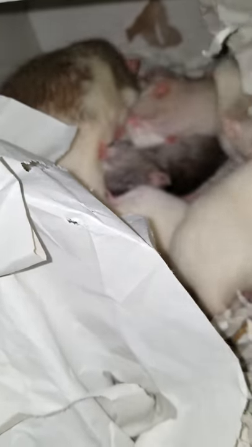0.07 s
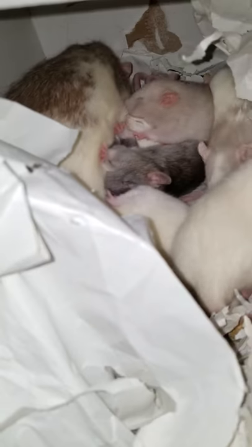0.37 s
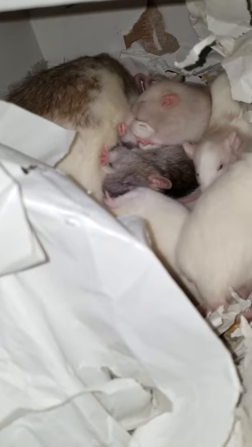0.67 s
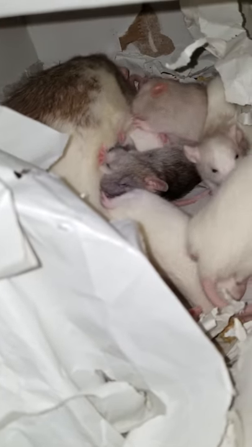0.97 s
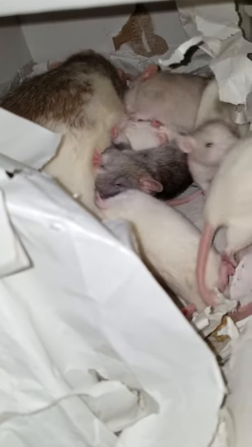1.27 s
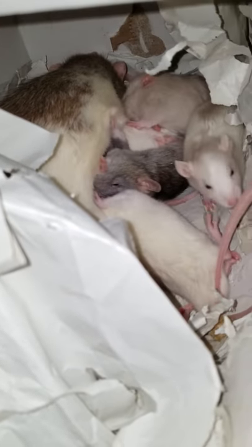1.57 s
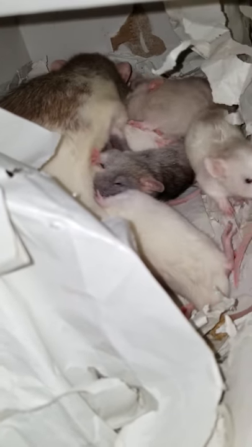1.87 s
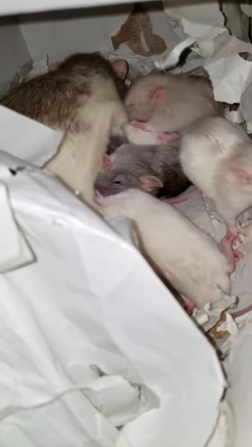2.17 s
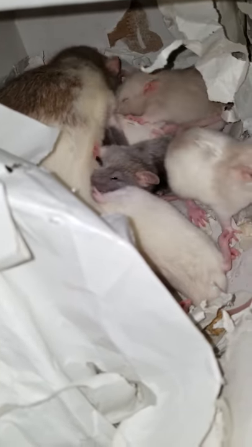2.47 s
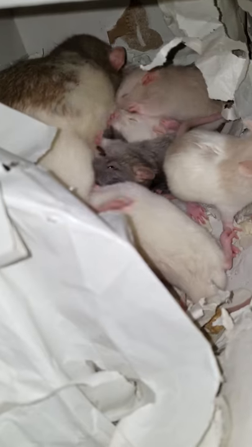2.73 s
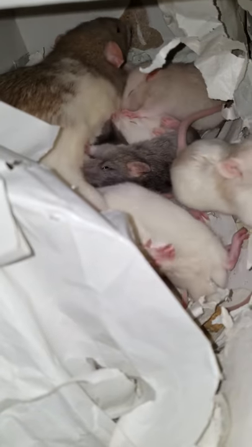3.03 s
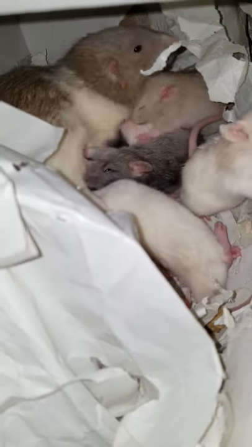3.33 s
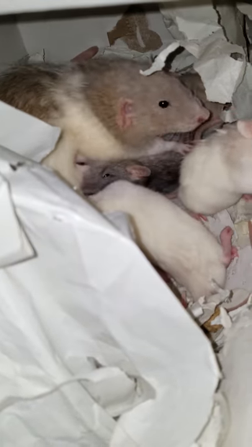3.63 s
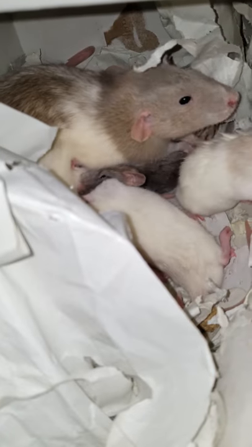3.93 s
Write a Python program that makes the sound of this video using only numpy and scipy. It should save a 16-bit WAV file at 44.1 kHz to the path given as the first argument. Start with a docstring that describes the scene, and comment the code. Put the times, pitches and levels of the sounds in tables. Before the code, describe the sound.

Young rats squeak and squeal up close over faint paper rustling.

```python
"""High, close squeaks of young rats, over rustling paper, soft bumps and a quiet room hum.
Each squeak is a gliding stack of harmonics that breaks into subharmonics and rasp when strained.
The rats sit in a plastic tub lined with shredded paper: paws thump the tub and ring its modes,
the paper rustles, scrapes and snaps. The tub walls and the room add short echoes."""
import sys
import numpy as np
from scipy import signal
from scipy.fft import rfft, irfft, next_fast_len
from scipy.io import wavfile
from scipy.ndimage import map_coordinates

SR = 44100
rng = np.random.default_rng(int(sys.argv[2]) if len(sys.argv) > 2 else 0)


def unload_audio(sound):
    """Save the sound as a 16-bit wav file, at the path given as the first command line argument."""
    columns = np.transpose(np.atleast_2d(sound))
    # keep every value between -1 and 1, then stretch to whole-number steps
    steps = np.round(np.clip(columns, -1, 1) * 32767)
    wavfile.write(sys.argv[1], SR, steps.astype(np.int16))


N = 176400
T = np.arange(N) / SR
TOP_HZ, TREBLE_HZ = 15800, 8500

# Stereo likeness of noise: freq_hz, correlation
COHERENCE = [(50, 0.97), (200, 0.85), (500, 0.32), (1500, 0.023), (4000, 0), (12000, 0.023)]
# Room noise spectrum: freq_hz, gain_db
ROOM_COLOUR = [(20, 2.5), (123, 7.5), (176, -8.5), (209, 5), (308, -8), (419, -3), (586, -22), (1020, -21),
               (2430, -18), (4500, -19), (8090, -10.5), (15800, -22)]
# Fan hum lines: freq_hz, level_db
FAN_HUM = [(59.2, -74), (237, -74.5), (296.1, -75.5), (331, -74.5)]

# Bodies shifting, before expansion: time_s, level_db
SHUFFLE_LEVELS = [(0.0, -83), (0.12, -69.5), (0.95, -65), (1.09, -56.5), (1.37, -60.5), (1.48, -57),
                  (1.92, -63), (1.94, -56.5), (2.05, -65.5), (2.84, -59.5), (3.05, -68), (3.91, -64),
                  (4.0, -68.5)]
# Paw steps: start_s, ring_db, t60_s, spot_hz, thump_db
STEPS = [(1.15, -45, 0.029, 880, -58), (1.456, -45, 0.079, 475, -50), (1.465, -50, 0.076, 1080, -61),
         (1.549, -39.5, 0.053, 390, -63), (1.657, -53.5, 0.061, 810, -48.5), (1.704, -55, .04, 380, -55),
         (1.812, -59, 0.054, 780, -53), (1.935, -42, 0.052, 675, -60), (2.81, -59.5, 0.029, 1010, -52),
         (2.934, -53.5, 0.045, 1740, -58)]
# Tub modes: freq_hz, gain_db, t60_ratio
TUB_MODES = [(390.6, -3.5, 1.5), (538, 1, 0.8), (643, -1, 1.2), (750, 2, 1.14), (826, -0.5, 1.1),
             (1085, 2, 0.71), (1228, -2.5, 0.76), (1720, -2.5, 1.9)]
# Tub floor spectra: freq_hz, gain_db
SHUFFLE_COLOUR = [(25, -57), (70, 6.5), (110, -2), (200, -2), (400, -1), (550, -13), (850, -11.5),
                  (1500, -24), (4000, -52)]
THUMP_COLOUR = [(40, -10), (120, 3), (380, 2.5), (550, -11.5), (1500, -37), (5000, -38)]

# Paper rustle envelope: time_s, body_gain_db, crisp_gain_db
RUSTLE_LEVELS = [(0, -63.5, -87), (.4, -73, -75), (.65, -70, -60), (.75, -71.5, -68), (1.05, -65, -67),
                 (1.28, -64, -57), (1.5, -62.5, -60), (1.63, -60.5, -73), (1.75, -70.5, -64.5),
                 (2.05, -74.5, -68), (2.38, -66.5, -63), (2.52, -66.5, -90), (2.6, -59.5, -74),
                 (2.72, -60, -57), (2.86, -63, -78), (2.97, -61, -55.5), (3.3, -69.5, -65), (4, -68, -74)]
# Paper scrapes: centre_s, level_db, half_width_s, tilt_db_per_octave
SCRAPES = [(0.648, -57, 0.016, 0), (1.401, -51, 0.014, 18), (1.675, -55, 0.0026, -5),
           (1.903, -49, 0.011, 4), (2.989, -49.5, 0.012, 5.5)]
# Paper snaps: start_s, level_db, t60_s, pan_db
SNAPS = [(0.061, -49, 0.043, -1), (0.5773, -62, 0.014, 7), (0.9925, -67, 0.01, 14.5),
         (1.5481, -32.5, 0.031, -2), (1.599, -45.5, 0.03, 5), (1.9643, -44.5, 0.01, 1),
         (2.4679, -47.5, 0.02, 0), (2.6487, -56, 0.017, -11), (2.9332, -51, 0.018, 3)]
# Paper spectra: freq_hz, gain_db
RUSTLE_COLOUR = [(300, -16.5), (800, -7.5), (1500, -1.5), (3000, 0.5), (5500, 2.5), (9000, -1),
                 (11700, 1.5), (14000, -2.5)]
CRISP_COLOUR = [(6000, -29), (11000, 2), (15500, 2)]
SCRAPE_COLOUR = [(500, -44), (3000, -7), (5000, -2.5), (8000, 2.5), (12000, -1.5), (16000, -19)]
SNAP_COLOUR = [(200, -9), (800, -4.5), (1500, -3), (3000, 4.5), (5000, 2), (8000, -7), (12000, -1),
               (16000, -8)]

# Squeak contours: time_s, pitch_hz, fundamental_gain_db, octave_gain_db, rasp_gain_db
FIRST = [(0.283, 3080, -50, -51.5, -75), (0.293, 2826, -50, -54, -67), (0.315, 2560, -44, -53, -64),
         (0.338, 2528, -40, -56, -67), (0.358, 2640, -48.5, -53, -69), (0.37, 2480, -50.5, -69, -59)]
PEEP = [(0.776, 3086, -57, -59.5, -81), (0.795, 3118, -54, -56.5, -77), (0.825, 3082, -50.5, -58.5, -95),
        (0.849, 3000, -57.5, -63.5, -61.5)]
YELP = [(1.036, 3050, -51, -60, -75), (1.043, 3070, -41.5, -47, -73), (1.051, 2790, -57, -60, -71),
        (1.072, 2475, -42, -47.5, -74), (1.097, 2450, -42, -47, -82), (1.112, 2370, -42.5, -44, -74),
        (1.124, 2630, -49, -65, -49.5)]
WHIMPER = [(2.343, 2960, -58, -68, -69), (2.36, 2735, -53, -68, -79), (2.378, 2830, -47.5, -59.5, -79),
           (2.412, 2590, -57.5, -58.5, -66), (2.43, 2370, -56, -87, -72)]
CROAK = [(2.503, 3220, -57.5, -63, -70), (2.512, 2570, -56, -63, -60), (2.519, 3030, -55, -75, -52),
         (2.535, 3005, -58, -80, -49)]
GRUNT = [(2.532, 2170, -51, -57, -62), (2.541, 2103, -56, -57, -71), (2.549, 2070, -55.5, -57, -58),
         (2.555, 2480, -44.5, -76, -63)]
PROTEST = [(2.783, 2615, -46.5, -56.5, -59), (2.805, 2887, -52, -53, -75.5), (2.815, 2676, -41.5, -53, -67),
           (2.828, 2794, -44.5, -50, -85), (2.85, 2442, -36, -54.5, -50.5), (2.875, 2283, -48, -52.5, -50),
           (2.902, 1996, -50.5, -66, -52.5)]
SQUEAL = [(3.035, 3076, -48, -48, -67), (3.042, 3160, -44, -36, -65), (3.049, 2650, -46, -54, -73),
          (3.062, 2733, -44.5, -45, -46.5), (3.073, 2557, -39.5, -45, -52), (3.088, 2380, -40, -38, -52),
          (3.11, 2503, -35.5, -43.5, -66), (3.124, 2630, -35, -40, -60), (3.139, 2604, -42, -41, -57),
          (3.15, 2533, -33.5, -38, -63), (3.167, 2700, -44, -44.5, -58.5), (3.185, 2513, -33, -40.5, -62),
          (3.198, 2660, -48, -40.5, -49.5), (3.212, 2643, -36, -41.5, -53),
          (3.223, 2470, -37.5, -40.5, -62), (3.236, 2457, -33.5, -46, -74), (3.246, 2716, -46, -42, -63),
          (3.255, 2520, -43.5, -68, -74)]
PIP = [(3.292, 2590, -60, -58, -72), (3.303, 2480, -58.5, -67, -74)]
STRAINED = [(3.404, 2530, -45, -67, -54), (3.418, 2327, -44, -54.5, -57.5),
            (3.434, 2340, -38.5, -53, -44.5), (3.445, 2320, -39.5, -48, -80),
            (3.462, 2400, -39.5, -46, -69), (3.476, 2352, -38.5, -46.5, -64), (3.487, 2280, -42, -51, -55)]
CRACKED = [(3.486, 2212, -47, -47, -48), (3.493, 2224, -47, -44.5, -73), (3.508, 2186, -53, -48, -46.5),
           (3.519, 2070, -56, -52, -46), (3.528, 2070, -47.5, -60, -64)]
WHISTLE = [(3.513, 2410, -70, -42.5, -49), (3.53, 2470, -72, -50, -53), (3.548, 2414, -76, -42, -64.5),
           (3.573, 2330, -77, -47.5, -56)]
SCREECH = [(3.58, 3533, -49, -60, -53.5), (3.6, 3380, -67, -58, -48), (3.625, 3122, -77, -57, -47),
           (3.65, 3354, -62, -76, -46.5), (3.683, 3447, -53.5, -75, -47.5), (3.692, 3145, -45, -54, -57.5),
           (3.715, 3247, -50, -57, -73), (3.745, 3092, -45.5, -54.5, -65), (3.758, 3342, -57, -59.5, -50.5),
           (3.785, 3147, -64, -72, -49), (3.808, 3050, -85, -71, -48.5), (3.828, 2232, -51.5, -80, -57.5)]
LAST = [(3.842, 2830, -44, -62, -62), (3.855, 3005, -40, -54, -61), (3.866, 2997, -34.5, -52, -70),
        (3.881, 2575, -47, -69, -55)]
SMOOTH, GRAINY, WILD = .15, .35, .55  # turbulence
CLEAR, HUSKY, HOARSE = .08, .24, .46  # flutter_rad
# Squeak voicing: contour, cycles_per_rasp_period, turbulence, flutter_rad, upper_db,
# tilt_db_per_octave, rasp_treble_db, fundamental_pan_db, octave_pan_db, left_lead_ms
SQUEAKS = [(FIRST, 2, WILD, HUSKY, -9, 4.5, 8, -5, -2.3, 0.13),
           (PEEP, 2, WILD, CLEAR, -6, 5, 5, 0.91, 3.7, 0.026),
           (YELP, 4, GRAINY, HUSKY, -17, 1, 0, -6, -15, 0.13),
           (WHIMPER, 2, WILD, HUSKY, -8, 11, 0, -1.2, 4.4, 0.15),
           (CROAK, 3, SMOOTH, HUSKY, -7, -1.8, 8.4, -14, -1, 0.17),
           (GRUNT, 3, SMOOTH, CLEAR, 0, -8, 9.8, -5, -1, 0.16),
           (PROTEST, 4, GRAINY, HOARSE, -2.5, -0.5, 11, -8, 4.8, 0.2),
           (SQUEAL, 5, WILD, HOARSE, -13.5, -5, 0.77, -6.5, -6.5, 0.094),
           (PIP, 2, GRAINY, HUSKY, -20, -5, 0, -4, -9, .08),
           (STRAINED, 2, SMOOTH, CLEAR, -7.5, 1.6, 12.5, -7.5, 2.5, 0.18),
           (CRACKED, 4, GRAINY, HUSKY, -12.5, 0, 0, -9.5, 3.4, 0.2),
           (WHISTLE, 5, WILD, CLEAR, -33, 0, 0, -2, -5, 0.22),
           (SCREECH, 3, WILD, HUSKY, -30, -6, -7, 10.5, 16, 0.15),
           (LAST, 2, WILD, HUSKY, -11, -6, 0, -2.7, 2, 0.15)]
# Voice spectra, harmonics above the octave and rasp: freq_hz, gain_db
UPPER_COLOUR = [(6500, -9), (8000, 2.5), (9800, -9.5), (11800, 0), (13500, -7), (16000, -22)]
THROAT_COLOUR = [(400, -28), (700, -10), (1000, -7), (1450, -8.5), (1750, 4), (2150, -6.5), (2550, 11.5),
                 (2850, 3), (3300, 6), (3900, -3.5), (5150, 0.5), (5600, -3.5), (6400, -3), (7300, -12),
                 (9500, -15), (12000, -9.5), (15000, -37)]
# Rasp balance: freq_hz, pan_db
RASP_PAN = [(1000, -8), (2500, 0.5), (5000, -0.5), (10000, 14)]


def amp(db):
    """Decibels to gain."""
    return 10 ** (np.asarray(db) / 20)


def unit_rms(x):
    """Scale to rms 1."""
    return x / np.sqrt(np.mean(x ** 2) + 1e-20)


def curve_at(points, hz):
    """Interpolate (freq_hz, value) points on a log axis."""
    knots_hz, values = np.transpose(points)
    return np.interp(np.log(hz + 1), np.log(knots_hz + 1), values)


def pan(db):
    """Constant-power stereo gains; db is left minus right."""
    gains = amp(np.array([[.5], [-.5]]) * db)
    return gains / np.sqrt(np.mean(gains ** 2, axis=0))


def wobble(rate_hz, size=N):
    """Smooth random curve through Gaussian knots."""
    knots = rng.standard_normal(int(size * rate_hz / SR) + 4)
    return map_coordinates(knots, [np.arange(size) * rate_hz / SR])


def filtered(x, response):
    """Zero-padded FFT filter with gain response(hz)."""
    n = x.shape[-1]
    padded = next_fast_len(n + 8192)
    return irfft(rfft(x, padded) * response(np.fft.rfftfreq(padded, 1 / SR)), padded)[..., :n]


def noise(colour):
    """Coloured stereo noise of rms 1, coherent in the bass."""
    def response(hz):
        angle = np.arccos(curve_at(COHERENCE, hz)) / 2
        return amp(curve_at(colour, hz)) * [np.cos(angle), np.sin(angle)]
    mid, side = filtered(rng.standard_normal((2, N)), response)
    return unit_rms(np.array([mid + side, mid - side]))


def struck(t, t60_s, attack_s):
    """Quick rise, exponential decay."""
    t = np.maximum(t, 0)
    return (1 - np.exp(-t / attack_s)) * np.exp(-np.log(1000) * t / t60_s)


def room():
    """Steady room noise and a faint, wavering fan hum."""
    out = amp(-64.5) * noise(ROOM_COLOUR)
    for hz, db in FAN_HUM:
        line = np.sqrt(2) * np.sin(2 * np.pi * hz * T + 1.01 * wobble(7))
        out += amp(db + 1.6 * wobble(5.16)) * pan(-7 if hz > 100 else 0) * line
    return out


def echo(x, t60_s):
    """Diffuse reflections: a decaying noise tail per channel."""
    t = T[:SR // 2]
    tail = rng.standard_normal((2, len(t))) * np.exp(-np.log(1000) * t / t60_s) * (t > .001)
    return signal.fftconvolve(x, tail / np.linalg.norm(tail[0]), axes=1)[:, :N]


def shuffle(expansion=1.52, gain_db=.5):
    """Shifting bodies rumble on the tub floor."""
    db = np.interp(T, *np.transpose(SHUFFLE_LEVELS))
    expanded_db = db.max() + expansion * (db - db.max())
    return pan(-5) * amp(expanded_db + gain_db) * noise(SHUFFLE_COLOUR)


def paws(spot_octaves=.34, share_floor=.19, scuff_rad=.62):
    """Steps thump and ring the tub; each spot favours the modes near its own pitch."""
    rings, t = np.zeros((2, N)), T[:SR // 4]
    for start_s, ring_db, t60_s, spot_hz, _ in STEPS:
        start = round(start_s * SR)
        for hz, mode_db, t60_ratio in TUB_MODES:
            share = share_floor + np.exp(-(np.log2(hz / spot_hz) / spot_octaves) ** 2)
            phase = 2 * np.pi * hz * t + scuff_rad * wobble(255, len(t)) + rng.normal(0, .92, (2, 1))
            envelope = amp(ring_db + mode_db) * struck(t, t60_s * t60_ratio, attack_s=.0012)
            rings[:, start:start + len(t)] += share * envelope * np.sin(phase)
    thumps = sum(amp(db) * struck(T - start_s, t60_s=.11, attack_s=.0023) for start_s, *_, db in STEPS)
    return pan(2) * rings + thumps * noise(THUMP_COLOUR)


def grains(grain_db=4, flutter_db=.9):
    """Fast random gain that gives paper its grain."""
    return unit_rms(amp(grain_db * wobble(1500) + flutter_db * wobble(45)))


def paper(body_boost_db=3):
    """Shredded bedding: grainy rustle, short scrapes, sharp snaps."""
    times_s, *levels_db = np.transpose(RUSTLE_LEVELS)
    body, crisp = [amp(np.interp(T, times_s, db)) for db in levels_db]
    rustle = amp(body_boost_db) * body * noise(RUSTLE_COLOUR) + crisp * noise(CRISP_COLOUR)
    scrapes = np.zeros((2, N))
    for centre_s, level_db, half_width_s, tilt in SCRAPES:
        colour = [(hz, db + tilt * np.log2(hz / TREBLE_HZ)) for hz, db in SCRAPE_COLOUR]
        scrapes += amp(level_db) * np.exp(-((T - centre_s) / half_width_s) ** 2) * noise(colour)
    snaps = sum(amp(db) * pan(pan_db) * struck(T - start_s, t60_s, attack_s=.00014)
                for start_s, db, t60_s, pan_db in SNAPS)
    return rustle * grains() + scrapes * grains() + snaps * noise(SNAP_COLOUR)


def rasp(pitch_hz, cycles, turbulence, treble_db, lag_s, wander=.045, stutter_db=2):
    """Subharmonics that wander and blur with turbulence, coloured by the throat."""
    def response(hz):
        shelf_db = treble_db * hz ** 8 / (hz ** 8 + TREBLE_HZ ** 8)
        stereo = pan(curve_at(RASP_PAN, hz)) * np.exp(-2j * np.pi * hz * lag_s)
        return amp(curve_at(THROAT_COLOUR, hz) + shelf_db) * stereo
    n, sub_hz = len(pitch_hz), pitch_hz / cycles
    phase = 2 * np.pi * np.cumsum(sub_hz * (1 + wander * turbulence * wobble(128.2, n))) / SR
    lines = np.zeros(n)
    for k in range(1, 24):
        blur_rad = rng.uniform(0, 2 * np.pi) + 2 * turbulence * wobble(152.1, n)
        lines += np.cos(k * phase + blur_rad) * (k * sub_hz < TOP_HZ)
    pulsed_noise = turbulence * (1 + np.cos(phase)) * rng.standard_normal((2, n))
    source = (unit_rms(lines) + pulsed_noise) * amp(stutter_db * wobble(140, n))
    return unit_rms(filtered(source, response))


def squeak(contour, cycles, turbulence, flutter_rad, upper_db, tilt, treble_db,
           fundamental_pan_db, octave_pan_db, lead_ms):
    """One call: six harmonics on a gliding pitch, shaken more as the rasp grows."""
    attack_s, release_s = .004, .0052
    tone_boost_db, rasp_boost_db, shimmer_db, upper_pan_db = 1.5, 2.5, 1.3, 6.5
    times_s, *columns = np.transpose(contour)
    active = (T > times_s[0] - attack_s) & (T < times_s[-1] + release_s)
    t, n = T[active], active.sum()
    pitch_hz, fundamental_db, octave_db, rasp_db = [np.interp(t, times_s, c) for c in columns]
    strain = turbulence * amp(rasp_db) / (amp(rasp_db) + amp(fundamental_db) + amp(octave_db))
    jitter = .002 + .05 * np.minimum(strain, turbulence / 2)
    pitch_hz *= 1 + jitter * wobble(355.6, n)
    lag_s = np.array([[0], [lead_ms / 1000]])
    shake_rad = 1.8 * strain * wobble(1100, n)
    phase = 2 * np.pi * (np.cumsum(pitch_hz) / SR - pitch_hz * lag_s) + shake_rad
    partials = [(fundamental_db, fundamental_pan_db), (octave_db, octave_pan_db)]
    for k in range(3, 7):
        colour_db = curve_at(UPPER_COLOUR, k * pitch_hz) + tilt * np.log2(k / 3)
        partials.append((octave_db + upper_db + colour_db, upper_pan_db))
    tone = np.zeros((2, n))
    for k, (db, pan_db) in enumerate(partials, 1):
        gain = np.sqrt(2) * amp(db + tone_boost_db + shimmer_db * wobble(171, n)) * pan(pan_db)
        tone += gain * np.sin(k * phase + flutter_rad * (k - 1) * wobble(1300, n))
    rough = amp(rasp_db + rasp_boost_db) * rasp(pitch_hz, cycles, turbulence, treble_db, lag_s)
    gate = np.clip((t - t[0]) / attack_s, 0, 1) * np.clip((t[-1] - t) / release_s, 0, 1)
    out = np.zeros((2, N))
    out[:, active] = gate * (tone + rough)
    return out


def scene():
    """Rats and bedding, echoed by tub and room, over the room noise."""
    near = sum(squeak(*row) for row in SQUEAKS) + paper() + paws() + shuffle()
    tub_echo = amp(-16) * echo(near, t60_s=.02)
    room_echo = amp(-25) * echo(near, t60_s=.25)
    return room() + room_echo + tub_echo + near


def record(dry):
    """Brick-wall low-pass at TOP_HZ."""
    return filtered(dry, lambda hz: hz < TOP_HZ)


dry = scene()
out = record(dry)
unload_audio(out)
```